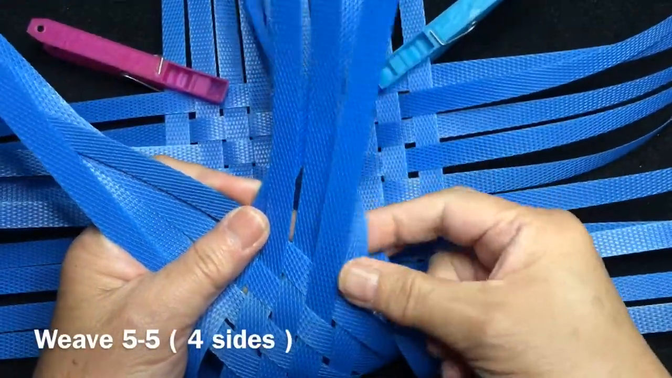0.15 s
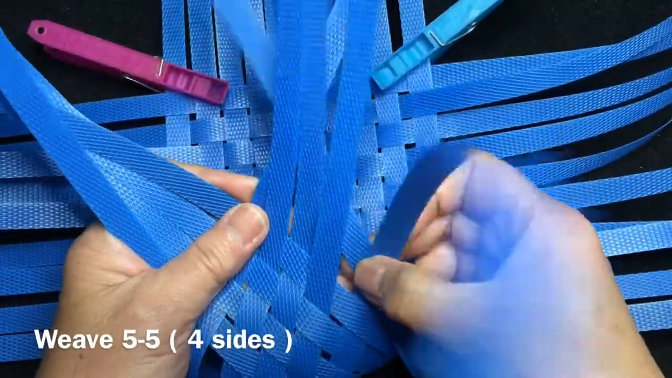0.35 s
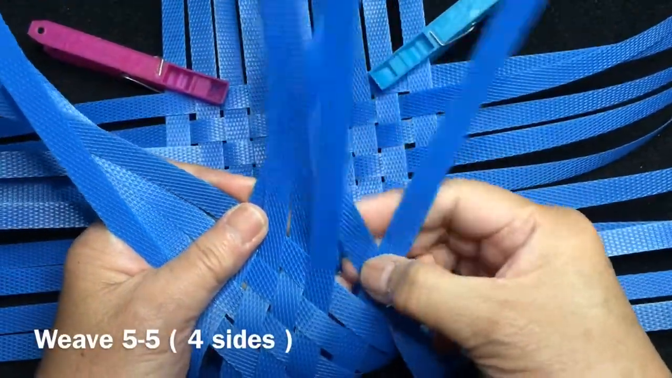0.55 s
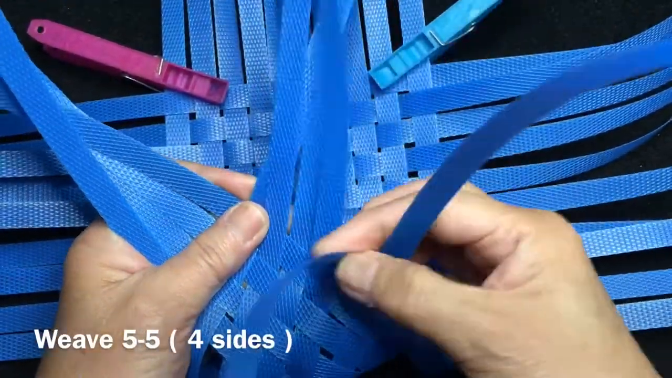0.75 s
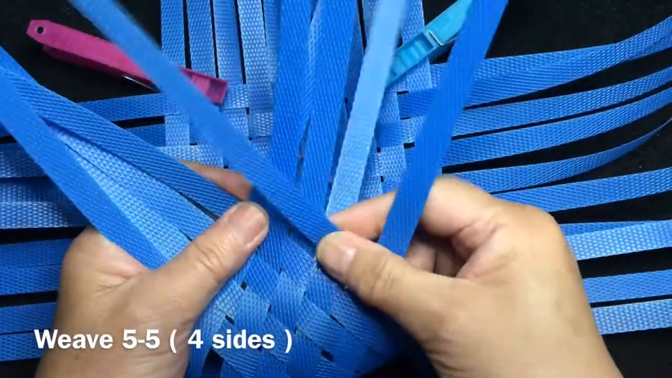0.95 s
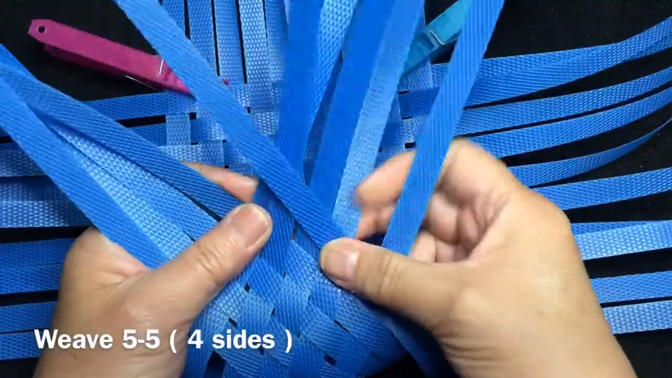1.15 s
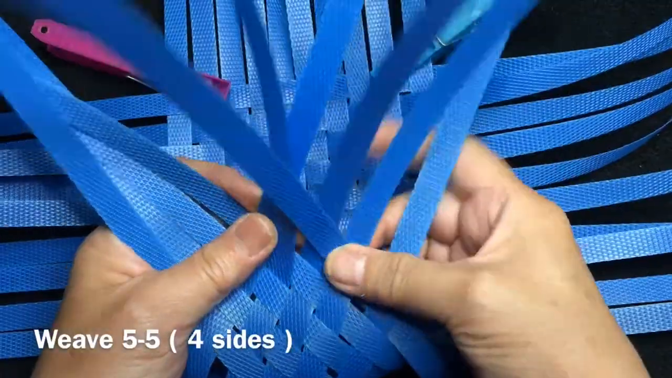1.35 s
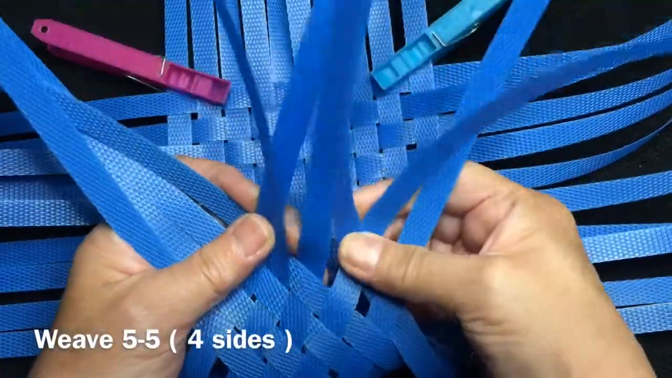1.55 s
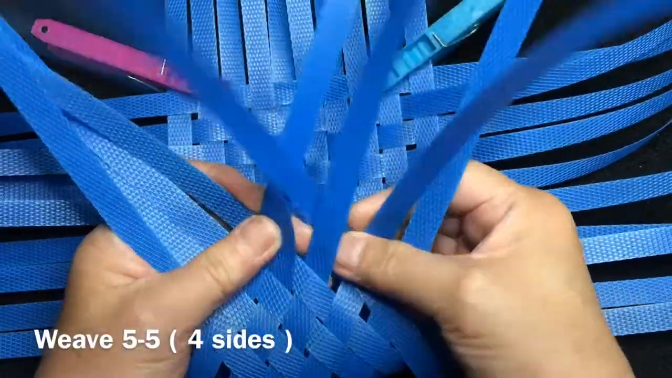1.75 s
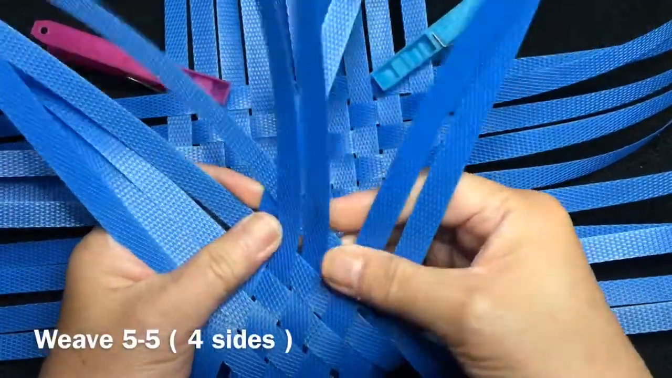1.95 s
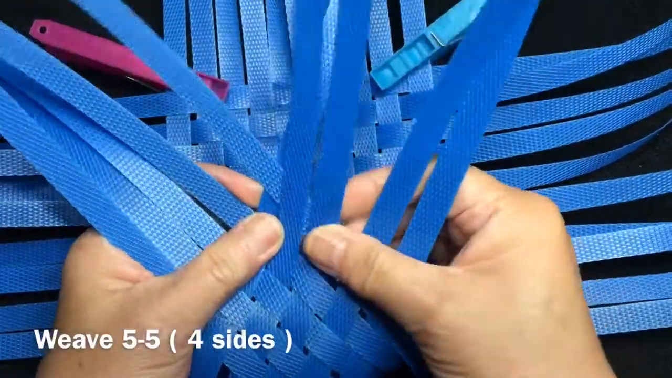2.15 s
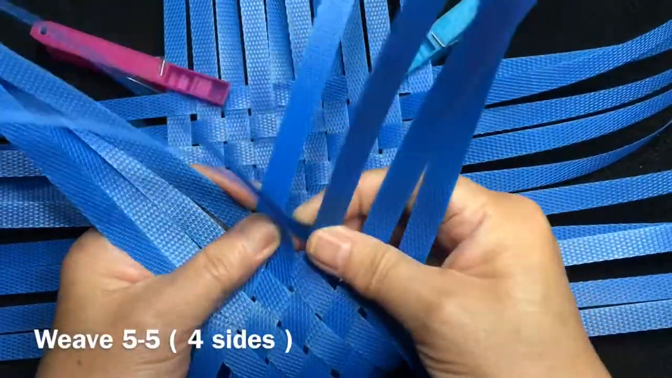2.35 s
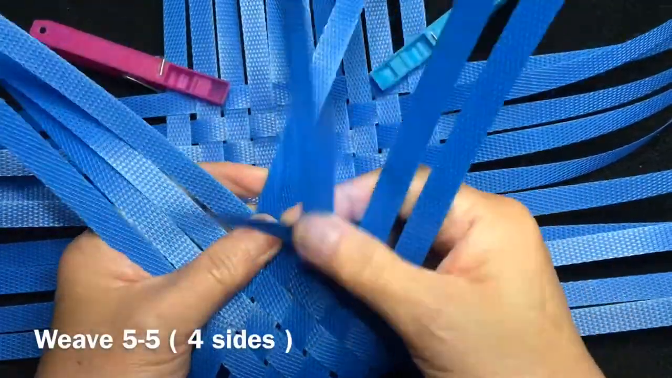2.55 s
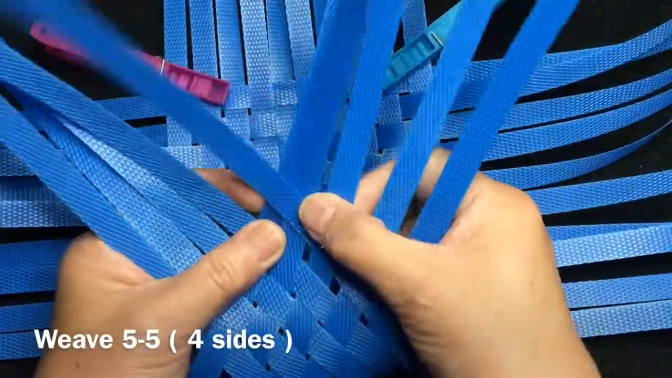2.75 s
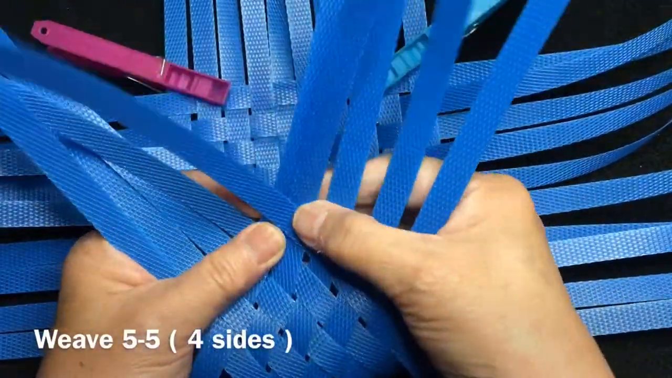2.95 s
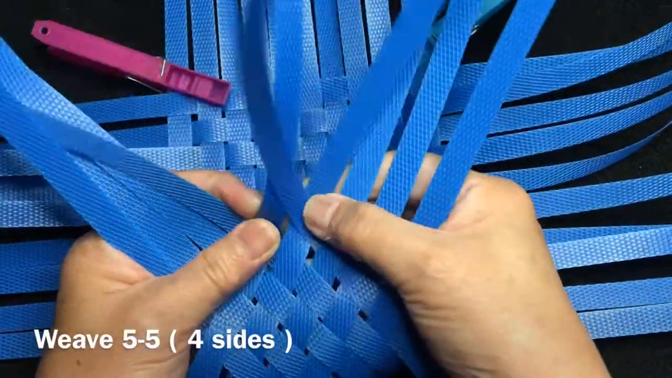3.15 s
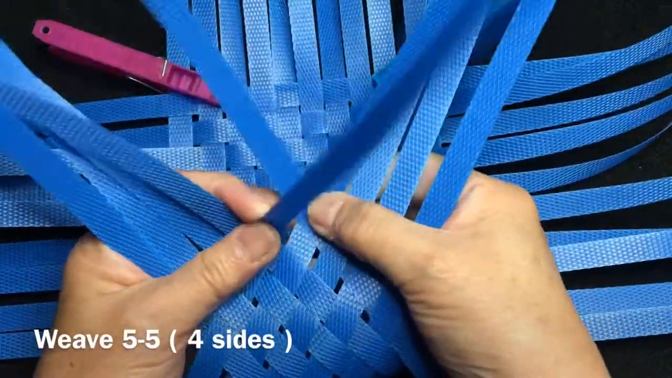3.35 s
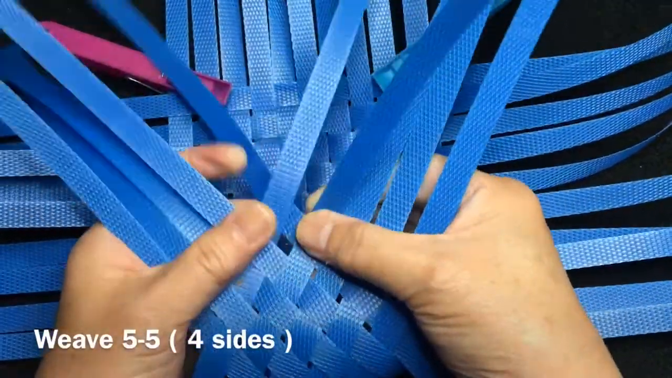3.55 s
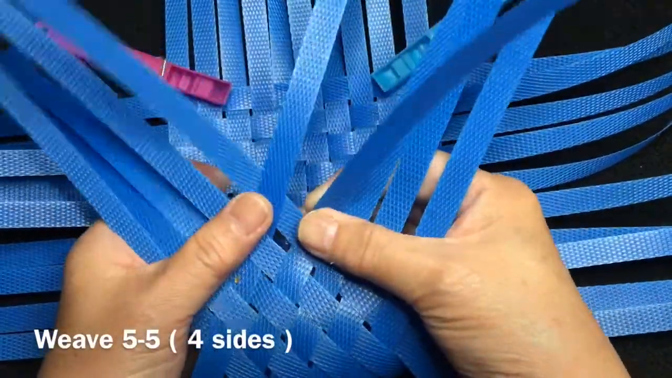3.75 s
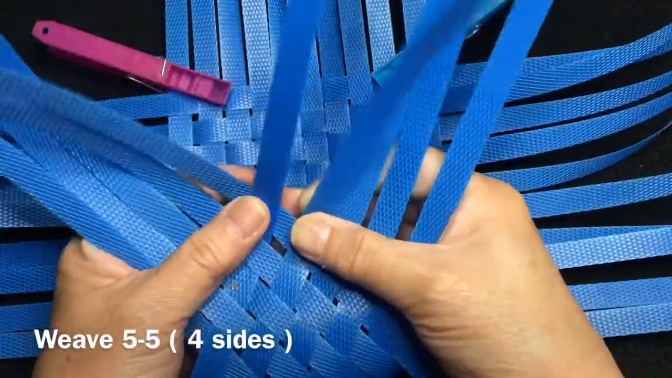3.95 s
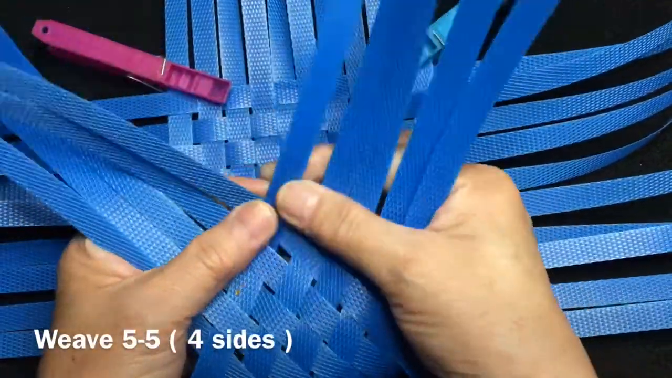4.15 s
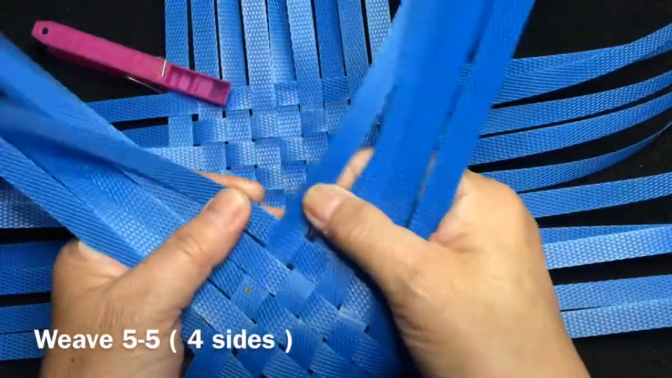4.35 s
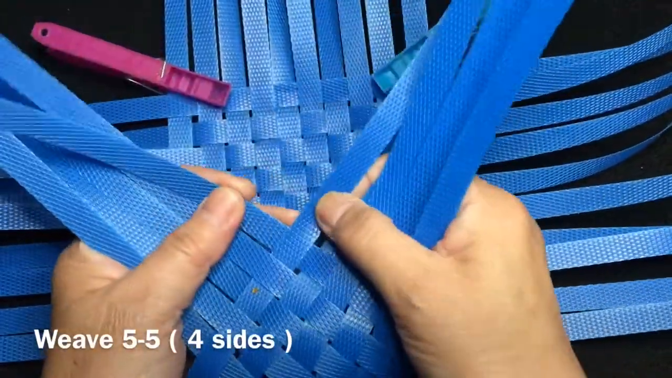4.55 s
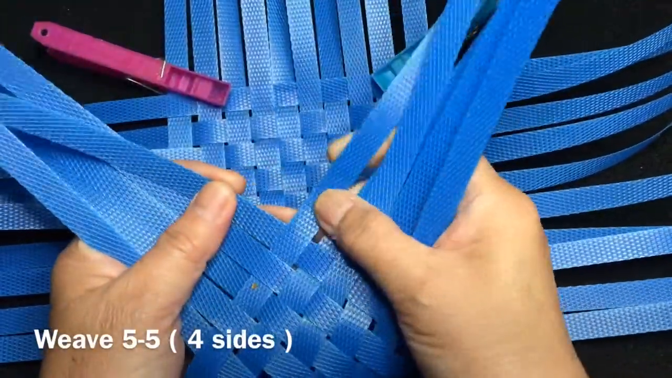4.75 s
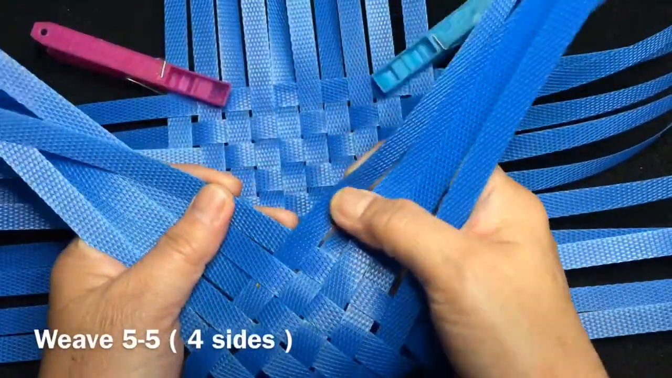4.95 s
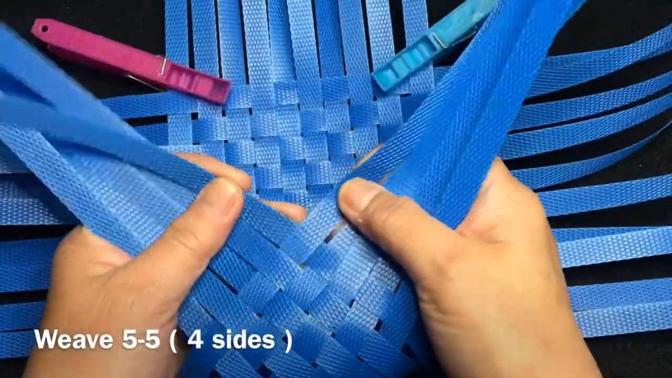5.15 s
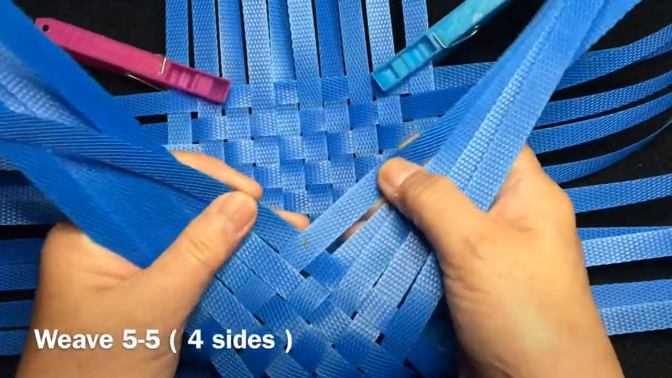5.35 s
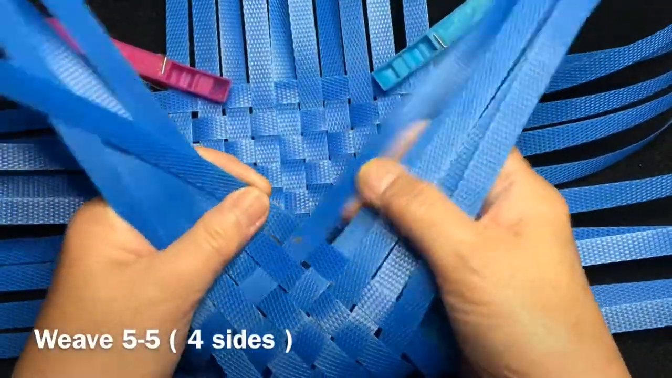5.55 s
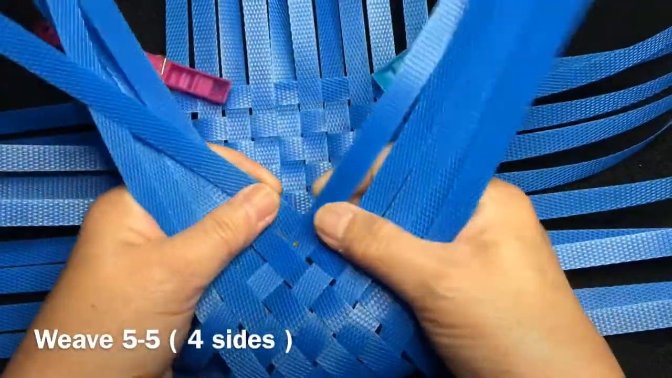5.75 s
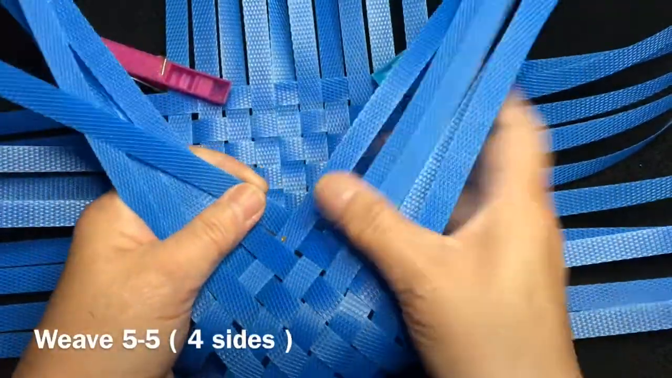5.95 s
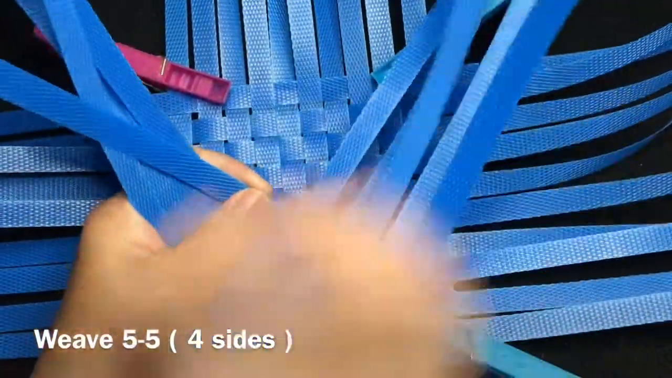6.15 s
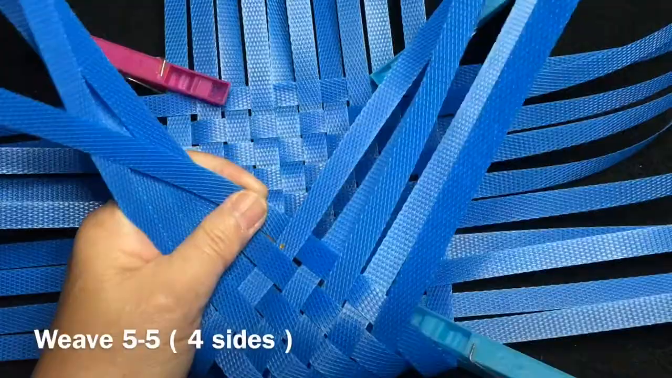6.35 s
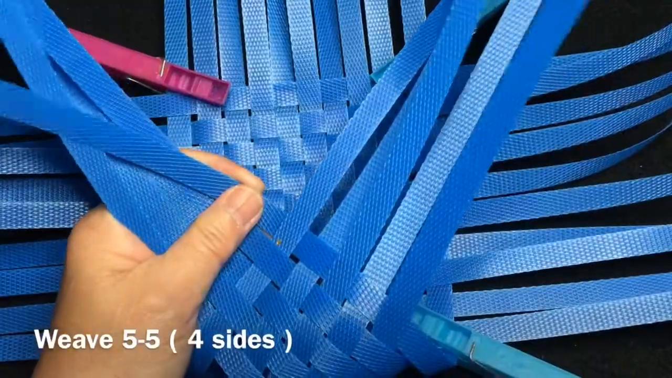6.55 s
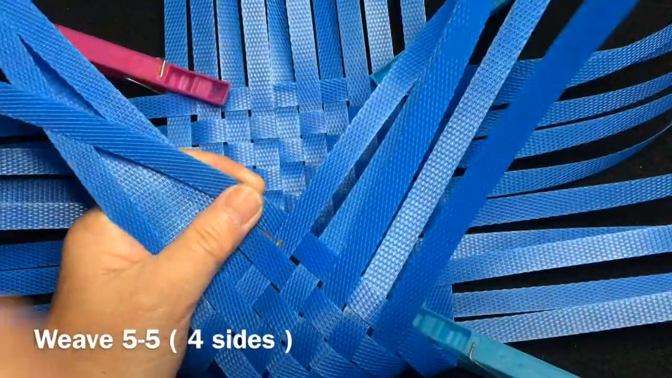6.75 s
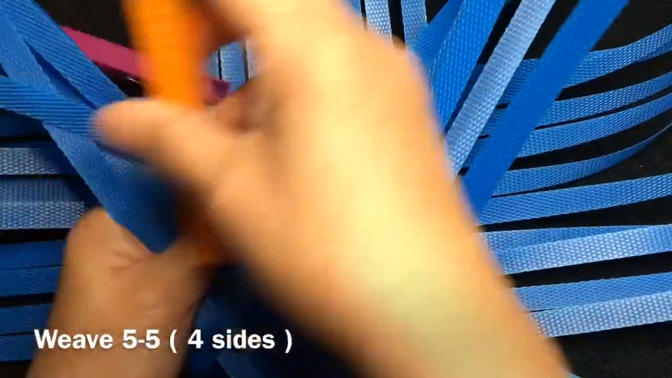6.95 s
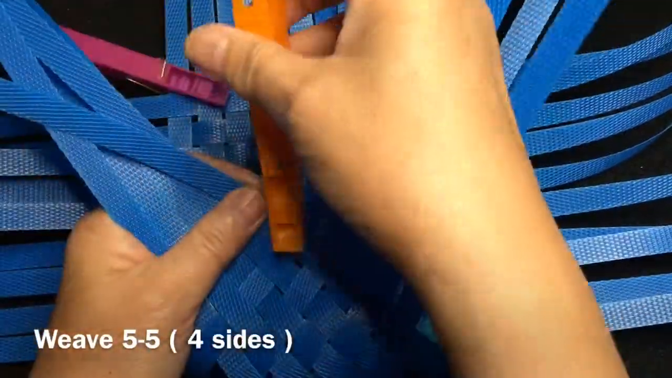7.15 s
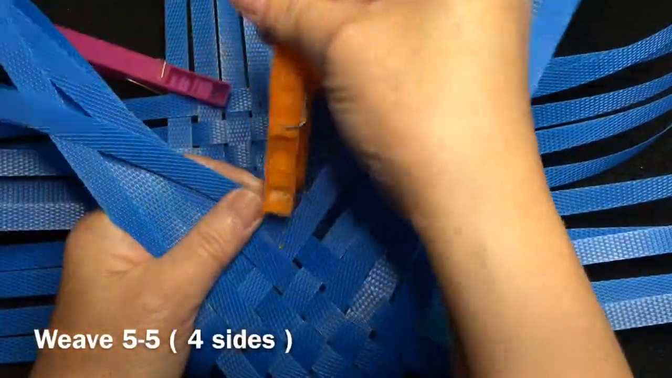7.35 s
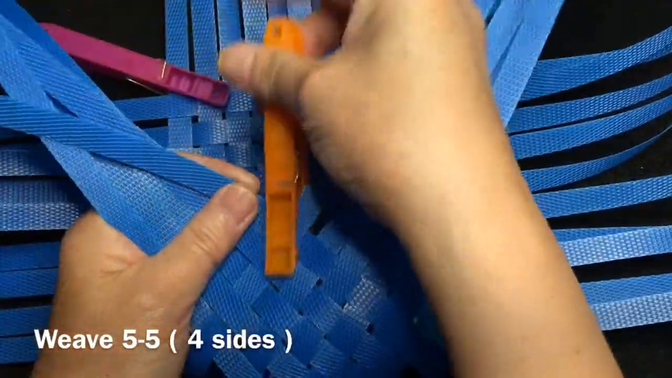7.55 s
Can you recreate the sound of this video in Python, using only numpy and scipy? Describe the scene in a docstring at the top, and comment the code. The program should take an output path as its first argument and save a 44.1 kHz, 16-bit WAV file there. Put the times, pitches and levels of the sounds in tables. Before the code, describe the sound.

Very close in a small quiet room, hands weave stiff plastic strips. Edges snap with crisp clicks, textured faces rasp in quick jerks, and light crackling rustles swell with each pull. The loose mat thumps and creaks softly underneath. Activity is irregular and busy for about six seconds, then thins to near quiet before a small dull clothes-peg knock and a few last clicks. A low wavering rumble stays beneath.

```python
"""At a table in a small room, hands weave stiff plastic strapping strips, heard close; a clothes peg knocks.
Strip edges snap past each other and embossed faces rasp and slide: noise and spikes through strip resonances.
The woven mat bumps and flexes: short damped low notes and low creaking noise.
Under it lies a low, wavering noise rumble that swells now and then."""
import sys
import numpy as np
from scipy import signal
from scipy.fft import rfft, irfft, next_fast_len
from scipy.io import wavfile

SR = 44100
rng = np.random.default_rng(int(sys.argv[2]) if len(sys.argv) > 2 else 0)


def transcribe(u):
    """Save the signal u as a 16-bit wav file named by the first command-line argument.

    u: samples, shape (n,) or (channels, n), limited to [-1, 1]; the rate is SR.
    q: integer samples, one column per channel.
    """
    v = np.clip(np.atleast_2d(u).T, -1, 1)
    q = np.round(v * 32767).astype(np.int16)
    wavfile.write(sys.argv[1], SR, q)


N = 339129
TIME = np.arange(N) / SR
GRAIN = 4096  # samples in one short contact


def undb(db):
    """Decibels to amplitude gain."""
    return 10 ** (np.asarray(db) / 20)


def unit(x):
    """Scale to rms 1."""
    return x / np.sqrt(np.mean(x ** 2))


def freqs(size):
    """Frequencies of a spectrum in Hz, kept above zero."""
    return np.maximum(np.arange(size // 2 + 1) * SR / size, 1)


def shape(x, gain):
    """Filter by a gain for each frequency."""
    return irfft(rfft(x) * gain, len(x))


def colour(points, f):
    """Gain along (Hz, dB) points, straight over log frequency."""
    hz, db = np.transpose(points)
    return undb(np.interp(np.log(f), np.log(hz), db))


def resonance(f, hz, width_hz):
    """One damped resonance, gain 1 at its centre."""
    return 1 / (1 + 1j * (f * f - hz * hz) / (f * width_hz))


def fade(t, t60):
    """Exponential decay by 60 dB in t60 seconds."""
    return np.exp(-np.log(1000) * t / t60)


def walk(rate_hz):
    """Smooth random wandering with a spread near 1."""
    step = 32
    slow = rng.standard_normal(next_fast_len(N // step + 1))
    slow_hz = freqs(len(slow)) / step
    slow = unit(shape(slow, np.exp(-(slow_hz / rate_hz) ** 2)))
    return np.interp(np.arange(N) / step, np.arange(len(slow)), slow)


def add(out, start_s, x):
    """Mix x in at a time."""
    i = max(int(start_s * SR), 0)
    out[i:i + len(x)] += x[:max(N - i, 0)]


def strip_body(f):
    """A strip's response: broad colour lifted at its bending resonances."""
    # Colour of a rubbed strip. Each row: frequency in Hz, gain in dB.
    strip_colour = [(100, -25), (300, 1), (520, -7.5), (800, -2), (1150, 1.5), (1800, -0.5), (2600, -5.5),
                    (3800, -5), (6000, -9.5), (9000, -12), (12500, -14), (15000, -19.5), (16500, -34)]
    # Bending resonances. Each row: frequency in Hz, width in Hz, lift in dB.
    bending_modes = [(1244, 75, 4.5), (1675, 53, 3.5), (2260, 150, 1.5), (3350, 67, 2.5), (4680, 79, 3),
                     (5520, 79, 0.5), (6220, 91, 4), (8300, 360, 0), (11150, 190, 2.5), (11920, 190, 3.5),
                     (13200, 150, -4)]
    gain = colour(strip_colour, f)
    for hz, width_hz, lift_db in bending_modes:
        gain = gain * (1 + (undb(lift_db) - 1) * resonance(f, hz, width_hz))
    return gain


def radiate(force, tilt_db, ring_hz, uneven_db=3.0, spacing_hz=330):
    """Sound of a force through the strip response, energy 1: soft contact rings, hard is bright and dry."""
    ring_gain, ring_q = 2.2, 8
    f = freqs(GRAIN)
    hardness = undb(tilt_db * np.log2(np.maximum(f, 800) / 3500))  # tilt in dB per octave
    ring = 1 + ring_gain * undb(-max(tilt_db, 0)) * resonance(f, ring_hz, ring_hz / ring_q)
    # each point of contact favours other resonances
    favour = rng.standard_normal(size=128)
    contact = undb(uneven_db * np.interp(f, spacing_hz * np.arange(len(favour)), favour))
    y = shape(force, strip_body(f) * hardness * ring * contact)
    return y / np.sqrt(np.sum(y ** 2))


def snaps(lesser, flutter_t60=.018, lead_in_db=-7):
    """An edge lets go in one spike, and bending waves die out along the strip."""
    # Edges snapping free, and near 7.4 s the dull knock of a clothes peg.
    # Each row: time in seconds, relative level in dB, brightness in dB per octave, ring in Hz.
    snap_rows = [(.0515, -29.5, 2.5, 1263), (.0916, -44, 3, 3480), (.1344, -43.5, 3.5, 3850),
                 (.18, -44.5, -4, 1273), (.2944, -37, 5, 3742), (.426, -48, 5, 2370), (.658, -39, 2, 3116),
                 (.7395, -30, 0.5, 3485), (.7834, -40, 3.5, 2090), (.8823, -43.5, -0.5, 1610),
                 (.929, -46, -2.5, 1560), (1.0242, -46, 3, 1694), (1.0607, -40.5, 1, 3285),
                 (1.1592, -44, 1.5, 5280), (1.2655, -44, 2, 1622), (1.605, -39, -10, 1589),
                 (1.6471, -35, 4.5, 4180), (1.8092, -42, 5, 2127), (1.8865, -36.5, -2, 3430),
                 (1.925, -40, -2, 3344), (1.978, -41.5, 4, 3465), (2.056, -47.5, -0.5, 2650),
                 (2.1177, -40, 2, 3700), (2.2929, -40.5, 3, 2326), (2.3599, -44, 7, 4420),
                 (2.4056, -46, 1, 1523), (2.5586, -44, 3.5, 2090), (2.7, -40.5, -2, 7410),
                 (2.8769, -49, 2.5, 1665), (3.015, -55, 1, 4220), (3.1189, -24.5, 7.5, 4586),
                 (3.2832, -36, 3.5, 3440), (3.3471, -34, 2.5, 2272), (3.5304, -36.5, 1, 2180),
                 (3.549, -42.5, -1, 3530), (3.6093, -42.5, 4.5, 2101), (3.7219, -39.5, 0, 5010),
                 (3.7712, -41.5, -0.5, 1310), (3.851, -43, 1.5, 3200), (3.9063, -45, 2, 1580),
                 (3.921, -44.5, -1, 1690), (3.9821, -40, 6.5, 2280), (3.9938, -48.5, -2, 3270),
                 (4.0167, -36, -0.5, 3130), (4.0503, -38.5, -1.5, 1245), (4.072, -39.5, -6, 4090),
                 (4.0953, -32, 2.5, 2130), (4.1518, -43.5, 2, 1641), (4.3768, -32, 3, 3690),
                 (4.39, -26.5, 3, 7380), (4.4316, -26.5, -0.5, 2770), (4.5104, -42, -1, 1202),
                 (4.7876, -30, 7, 6085), (4.929, -46.5, 2.5, 1727), (5.044, -44.5, 2, 3400),
                 (5.1824, -41.5, -0.5, 1243), (5.3103, -33.5, -.5, 3284), (5.565, -40.5, 3, 3418),
                 (5.6164, -40.5, 2, 1747), (5.6542, -40, 0, 1191), (5.7974, -38, 2, 4343),
                 (5.8621, -48, 5.5, 1120), (5.9133, -49, 2, 1780), (5.9407, -43.5, -1, 3335),
                 (6.1238, -41, 3, 6100), (6.7013, -50, 2, 5260), (7.2306, -55, -2, 1250),
                 (7.3729, -43, 0, 1900), (7.3964, -38, 3.5, 1540), (7.399, -42.5, -8, 730),
                 (7.487, -44.5, 0, 1700), (7.5181, -41, 3, 6900), (7.544, -48, 4, 2020),
                 (7.5818, -46, 1, 2060), (7.643, -40.5, -1.5, 1666), (7.6767, -48.5, -13.5, 1980)]
    lead, spike, lead_in_t60 = 512, 5.2, .012  # lead in samples
    out = np.zeros(N)
    t = (np.arange(GRAIN) - lead) / SR
    # weaker noise swells briefly ahead of the spike
    lead_in = undb(lead_in_db) * fade(abs(t), lead_in_t60)
    envelope = np.where(t < 0, lead_in, fade(abs(t), flutter_t60))
    for s, db, tilt_db, ring_hz in [*snap_rows, *lesser]:
        force = rng.standard_normal(GRAIN) * envelope
        force[lead] = -spike
        snap = radiate(force, tilt_db, ring_hz)
        add(out, s - lead / SR, undb(db) * np.sqrt(0.0027 * SR) * snap)
    return out


def small_snaps(db, over_db=6, spread_db=6, most_db=-45, tilt_db=1.0, low_hz=1500, high_hz=4500,
                crowding=0.99, count=75):
    """Rows of lesser snaps at random moments, denser and stronger while the strips slide hard."""
    chance = np.cumsum(undb(crowding * db))
    rows = []
    for when, strength, pitch in rng.random((count, 3)):
        i = np.searchsorted(chance, when * chance[-1])
        level_db = min(db[i] + over_db, most_db) + spread_db * (strength - .5)
        ring_hz = low_hz * (high_hz / low_hz) ** pitch
        rows.append((TIME[i], level_db, tilt_db, ring_hz))
    return rows


def rasps(tooth_hz=900, scatter_db=4, hiss=0.23, skirt=3.3):
    """A strip jerked across another: embossed teeth catch in a quick uneven run that swells and stops."""
    # Jerks. Each row: middle in seconds, relative level in dB, brightness in dB per octave, ring in Hz,
    # length in seconds.
    jerks = [(0.237, -45.5, 1.5, 1272, 0.056), (.68, -34, 0.5, 1850, 0.016), (0.704, -39, 2, 1731, .02),
             (.746, -34.5, -0.8, 4120, 0.0052), (1.493, -47, 1.5, 3525, 0.0088),
             (1.622, -33.5, 0.5, 4100, 0.01), (1.6318, -30, 3.5, 5330, 0.0072),
             (1.759, -39.5, 2.5, 941, 0.012), (1.824, -38.5, 3.5, 1558, 0.014),
             (1.9125, -39.5, 4, 1640, 0.0051), (1.9886, -37, -2.5, 1835, 0.0061),
             (2.436, -21.5, 9, 4240, 0.0041), (2.447, -35.5, 2.3, 1176, .01),
             (2.716, -44.5, 4.5, 3716, 0.0089), (3.306, -30, 3, 4990, 0.013),
             (3.317, -33.5, 2, 1716, 0.0054), (3.884, -45, 2.5, 3430, 0.0093),
             (3.981, -43.5, -1, 3350, 0.011), (4.341, -43, 3, 4890, 0.006),
             (4.4272, -34, 1.5, 1290, 0.0045), (4.459, -42.5, 0, 2290, 0.042),
             (5.0788, -41.5, 3, 3290, 0.0099), (5.257, -44.5, 0.5, 1211, 0.0088),
             (5.97, -50, 0, 1816, 0.022), (6.875, -58, 5, 2810, 0.039), (7.357, -49.5, -1, 4830, 0.013),
             (7.494, -51.5, -0.5, 1290, 0.0089)]
    out = np.zeros(N)
    t = (np.arange(GRAIN) - GRAIN // 2) / SR
    for s, db, tilt_db, ring_hz, length_s in jerks:
        force = hiss * rng.standard_normal(GRAIN)
        gaps = rng.uniform(.5, 1.5, size=256) * SR / tooth_hz
        teeth = np.cumsum(gaps).astype(int)
        sizes = undb(scatter_db * rng.standard_normal(size=256))
        inside = teeth < GRAIN
        force[teeth[inside]] += sizes[inside]
        force *= np.hanning(GRAIN) / (1 + abs(2 * t / length_s) ** skirt)
        add(out, s + t[0], undb(db) * np.sqrt(length_s * SR) * radiate(force, tilt_db, ring_hz))
    return out


def sliding():
    """Sliding level and treble lift over time, in dB: pulls swell and run out above faint shifting."""
    # A hand pulls one strip along another. Each row: fastest moment in seconds, relative level in dB,
    # length in seconds, treble relative to body in dB.
    pulls = [(0.124, -55, 0.13, 3), (0.258, -48, .1, 2), (0.513, -57.5, .1, -22), (0.607, -48, .04, 5.5),
             (0.678, -41.5, 0.066, 2), (0.793, -42, 0.017, -3.5), (1.061, -58, 0.098, 1.5),
             (1.239, -58.5, 0.067, -18), (1.488, -49.5, .06, -20), (1.645, -50.5, 0.069, 5),
             (1.771, -49.5, 0.025, 4), (1.837, -45.5, 0.039, -7), (1.931, -49.5, 0.059, -2.5),
             (2.37, -50.5, 0.029, -6.5), (2.421, -43.5, 0.044, 0), (2.472, -53.5, 0.074, 7),
             (2.714, -51, 0.033, -2), (2.877, -64, .12, 0), (3.113, -53, 0.041, 7), (3.308, -44, 0.051, 0),
             (3.557, -48.5, 0.11, 0.5), (3.729, -61, 0.034, -3), (4.085, -52, 0.16, 2),
             (4.298, -52, 0.038, 5.5), (4.403, -50, 0.087, 6), (4.898, -57, 0.11, 4.5),
             (5.17, -54.5, 0.089, -27), (5.299, -46.5, 0.097, 0), (5.398, -66, 0.13, 4),
             (5.602, -48, .08, 2), (5.813, -47.5, 0.052, -4), (5.975, -56, 0.15, 0.5),
             (6.219, -59, 0.032, 6), (6.482, -57.5, 0.019, -6), (6.596, -65.5, 0.36, 5.5),
             (7.375, -55, 0.052, 0.5), (7.528, -61.5, 0.11, 3.5), (7.641, -55, 0.06, 3)]
    rise_share, edge = 0.44, 1.3  # share of length gathering speed; flank power (1 pointed, 2 round)
    # held strips still shift a little, until the right hand lets go to fetch a peg
    held_db, let_go_db, let_go_s, held_treble_db = -67, -77.5, 4.9, 5
    power = undb(np.where(TIME < let_go_s, held_db, let_go_db)) ** 2
    treble = power * held_treble_db
    for s, db, length_s, treble_db in pulls:
        along = np.maximum((s - TIME) / rise_share, (TIME - s) / (1 - rise_share)) / length_s
        flank = np.exp(-np.minimum(abs(along), 10) ** edge / 2)
        pull = (undb(db) * flank) ** 2
        power = power + pull
        treble = treble + pull * treble_db
    return 10 * np.log10(power), treble / power


def slide(db, treble, catch_hz=1200, scatter_db=0.5, hiss=0.83, grip_db=3.5, shift_db=4.5, shift_hz=18,
          pivot_hz=2000, span_octaves=2.6, gain_db=-7.0):
    """Tiny catches over fine friction; as the contact travels, different resonances speak up."""
    f = freqs(N)
    sizes = undb(scatter_db * np.minimum(rng.exponential(size=N), 4))
    catches = (rng.random(N) < catch_hz / SR) * sizes
    # each catch flutters on for a moment
    flutter = signal.lfilter([1], [1, -np.exp(-1 / (0.0013 * SR))], catches ** 2)
    force = unit(np.sqrt(flutter) * rng.standard_normal(N)) + hiss * rng.standard_normal(N)
    gripped = force * undb(grip_db * walk(45))
    rubbed = rfft(unit(shape(gripped, strip_body(f))))
    centres_hz, out = np.geomspace(450, 15000, 16), 0
    for hz, band in zip(centres_hz, np.eye(len(centres_hz))):
        lift_db = treble * np.clip(np.log2(hz / pivot_hz) / span_octaves, 0, 1.25)
        part = irfft(rubbed * np.interp(np.log(f), np.log(centres_hz), band), N)
        out = out + part * undb(lift_db + shift_db * walk(shift_hz))
    return undb(db + gain_db) * out


def crackle(db, treble, ticks_db=-3, scatter_db=2.0, tick_t60=0.014, focus_q=0.92, count=900):
    """Frayed edges flick past each other at random, each light tick around its own pitch."""
    out = np.zeros(N)
    t = (np.arange(GRAIN) - 256) / SR
    for when, strength, pitch in rng.random((count, 3)):
        i, hz = int(when * N), 1200 * 7 ** pitch
        # high ticks are weaker in a dull slide
        dullness_db = min(treble[i] - 5.5, 0) * pitch
        level_db = db[i] + ticks_db + dullness_db + scatter_db * min(-np.log(1 - strength), 2.5)
        force = rng.standard_normal(GRAIN) * (t >= 0) * fade(abs(t), tick_t60)
        force = shape(force, resonance(freqs(GRAIN), hz, hz / focus_q))
        add(out, TIME[i], undb(level_db) * np.sqrt(0.0023 * SR) * radiate(force, 0, hz))
    return out


def swishes(grain_db=4.0):
    """A smooth face drawn lightly does not catch: it only hisses, swelling and fading with the stroke."""
    # Light strokes. Each row: middle in seconds, relative level in dB, length in seconds.
    strokes = [(1.228, -69.5, 0.07), (4.728, -63, 0.057), (4.834, -74, 0.053), (7.08, -73.5, 0.14)]
    # Colour of the hiss. Each row: frequency in Hz, gain in dB.
    swish_colour = [(1000, -7), (3000, -10), (5500, -4), (8500, -1), (11500, -2), (14000, -5), (16500, -19)]
    stroke = 0
    for s, db, length_s in strokes:
        stroke = stroke + undb(db) * np.exp(-(2 * (TIME - s) / length_s) ** 4 / 2)
    hiss = unit(shape(rng.standard_normal(N), colour(swish_colour, freqs(N))))
    return stroke * undb(grain_db * walk(60)) * hiss


def bumps(push_s=0.0032, rough=0.32, gain_db=-2):
    """A soft push or flex sets the loose mat wobbling in a short, uneven low note; high notes die sooner."""
    # Bumps of the mat. Each row: start in seconds, relative level in dB, pitch in Hz.
    pushes = [(.055, -28, 130.3), (0.052, -30.5, 302.6), (0.676, -47, 329.6), (.751, -39.5, 166),
              (0.76, -36.5, 76), (0.791, -35.5, 285), (1.616, -40.5, 186), (1.634, -35.5, 477),
              (2.437, -35, 196.3), (2.445, -38, 312), (4.432, -38, 278.5), (4.438, -41.5, 114),
              (5.159, -38.5, 170.6), (5.319, -40, 122.9), (5.792, -37, 165.3), (5.85, -41, 85.05),
              (6.411, -36.5, 328.4), (6.528, -46, 72.6), (7.352, -40, 362), (7.407, -42.5, 78.7)]
    mid_t60, mid_hz, damping = 0.08, 168, .45  # ring time in seconds at the middle pitch
    out = np.zeros(N)
    t = np.arange(4 * GRAIN) / SR
    f = freqs(len(t))
    push = 1 - np.exp(-(t / push_s) ** 2)
    for s, db, hz in pushes:
        t60 = mid_t60 * (mid_hz / hz) ** damping
        wobble = unit(shape(rng.standard_normal(len(t)), resonance(f, hz, hz / 2) ** 2))
        note = np.sin(2 * np.pi * hz * t) + rough * wobble
        add(out, s, undb(db + gain_db) * note * push * fade(t, t60))
    return out


def flex(db, gain_db=-6, follow=0.52, mat_hz=170, width_hz=260, rest_db=-60):
    """The mat creaks low as the hands move it, more when the strips slide harder."""
    effort_db = rest_db + follow * (db - rest_db) + 3.7 * walk(7.9)
    creak = unit(shape(rng.standard_normal(N), resonance(freqs(N), mat_hz, width_hz) ** 2))
    return undb(effort_db + gain_db) * creak


def room(x, delay_s=0.00095):
    """Wall reflections build up over about a millisecond and decay by band, slowest in the bass."""
    # Reverberation bands. Each row: centre in Hz, t60 in seconds, relative level in dB.
    reverb_bands = [(250, 1, -11.5), (710, 0.27, -7.5), (1490, 0.66, -21.5), (3500, 0.21, -18),
                    (7000, 0.23, -15.5), (13000, 0.25, -19.5)]
    t = np.arange(SR // 2) / SR
    f, tail = freqs(len(t)), 0
    log_centres = np.log([row[0] for row in reverb_bands])
    noise = rng.standard_normal(len(t))
    for (_, t60, db), band in zip(reverb_bands, np.eye(len(reverb_bands))):
        envelope = fade(t, t60) * (1 - np.exp(-(t / delay_s) ** 2))
        envelope = envelope / np.sqrt(np.sum(envelope ** 2))
        tail = tail + undb(db) * shape(noise, np.interp(np.log(f), log_centres, band)) * envelope
    return signal.fftconvolve(x, tail)[:N]


def background(rumble_db=-59.5, waver_db=2.82, swell_width_hz=105, arch=0.15, air_db=-9, air_hz=620):
    """Wavering rumble and faint hiss; each low, airy swell rises a little in pitch and sinks again."""
    # Colour of the background. Each row: frequency in Hz, relative density in dB per Hz.
    room_colour = [(20, -19.5), (32, -16.5), (45, 2), (70, 1.5), (150, 1), (310, 0.5), (450, -15),
                   (620, -10.5), (900, -18), (1200, -18.5), (2500, -34), (6000, -35.5), (12000, -35),
                   (16000, -50)]
    # Rumble swells. Each row: middle in seconds, relative level in dB, length in seconds, top pitch in Hz.
    rumble_swells = [(2.941, -58, 0.16, 426), (5.167, -59.5, 0.16, 401.5), (5.532, -58, 0.18, 381.7)]
    rumble = unit(shape(rng.standard_normal(N), colour(room_colour, freqs(N))))
    out = undb(rumble_db + waver_db * walk(18)) * rumble
    air = undb(air_db) * unit(shape(rng.standard_normal(N), resonance(freqs(N), air_hz, air_hz) ** 2))
    for s, db, length_s, top_hz in rumble_swells:
        swell = np.exp(-(1.1 * (TIME - s) / length_s) ** 2)
        pitch_hz = top_hz * (1 - 2 * arch * (1 - swell))
        phase = 2 * np.pi * np.cumsum(pitch_hz) / SR
        # narrow noise around the moving pitch
        core = unit(walk(swell_width_hz) * np.cos(phase) + walk(swell_width_hz) * np.sin(phase))
        out += undb(db) * swell * (core + air)
    return out


def scene():
    """The weaving, its reflections and the room's own sound."""
    db, treble = sliding()
    weaving = snaps(small_snaps(db)) + rasps()
    weaving = weaving + slide(db, treble) + crackle(db, treble) + swishes()
    weaving = weaving + bumps() + flex(db)
    return (weaving + room(weaving) + background())[None]


def record(dry):
    """The recorder cuts the deepest bass and the top."""
    low_hz, top_hz = 36, 16200
    dry = signal.sosfilt(signal.butter(4, low_hz, "high", fs=SR, output="sos"), dry)
    return signal.sosfilt(signal.ellip(10, .2, 70, top_hz, fs=SR, output="sos"), dry)


dry = scene()
out = record(dry)
transcribe(out)
```